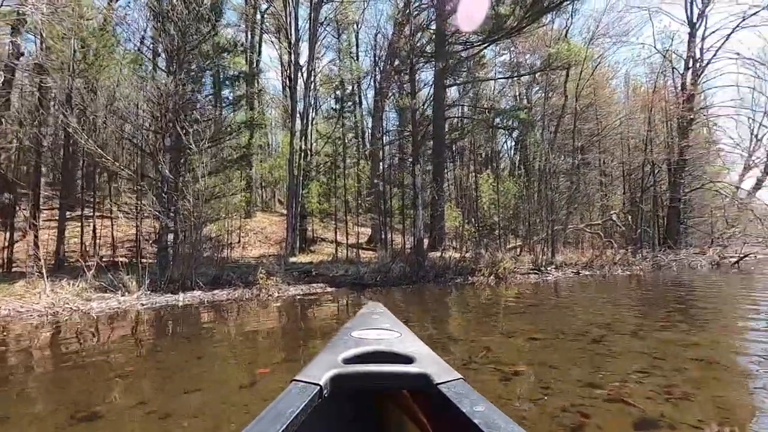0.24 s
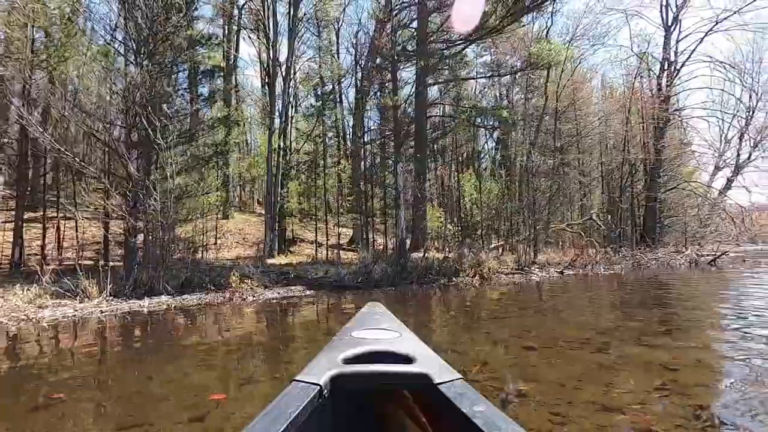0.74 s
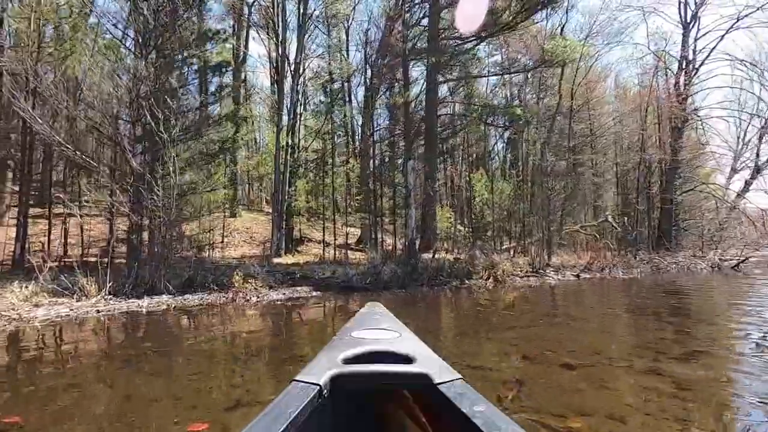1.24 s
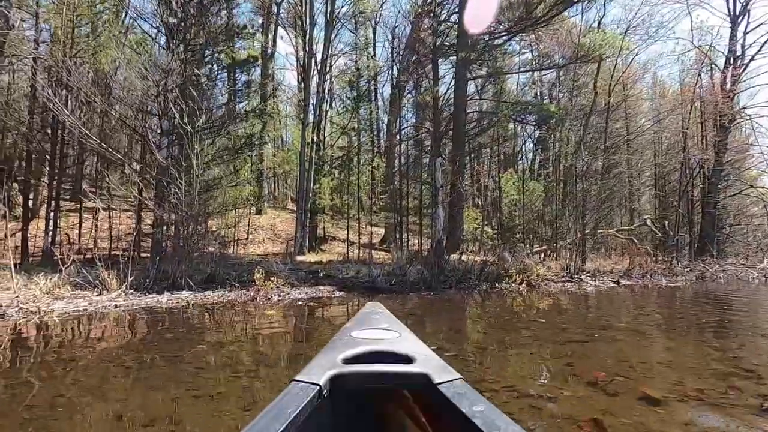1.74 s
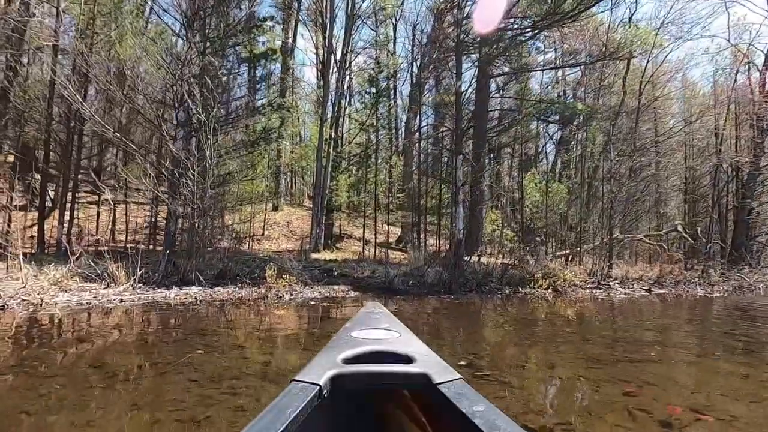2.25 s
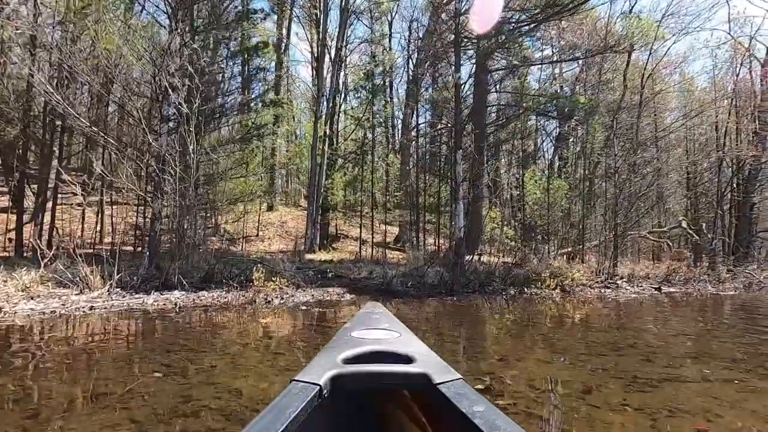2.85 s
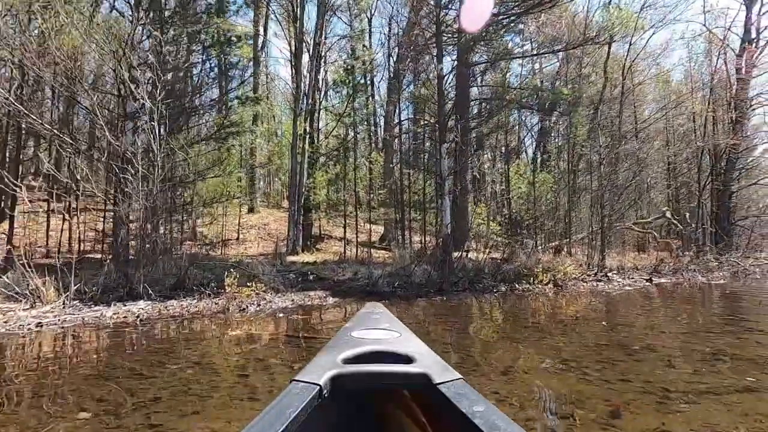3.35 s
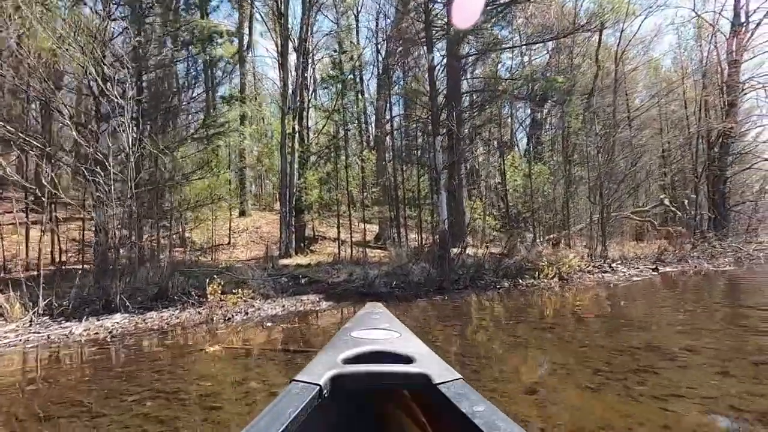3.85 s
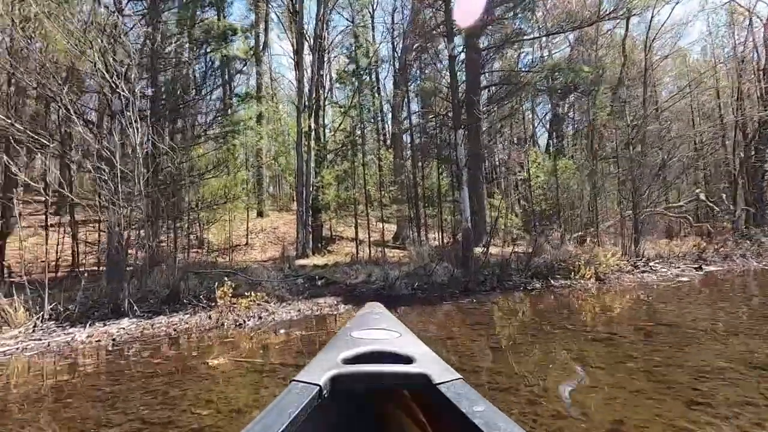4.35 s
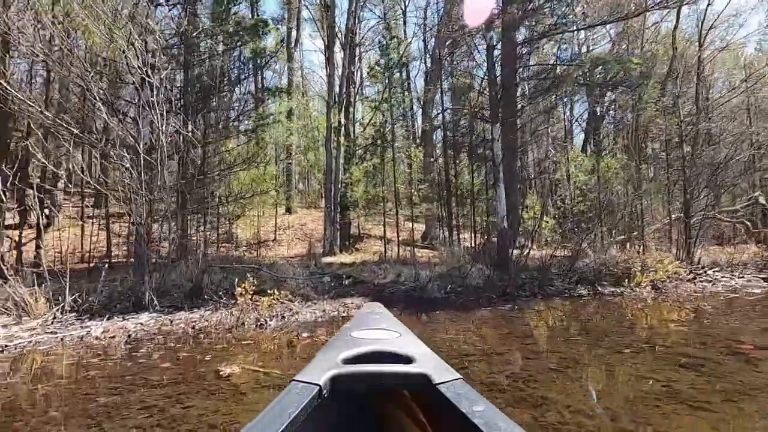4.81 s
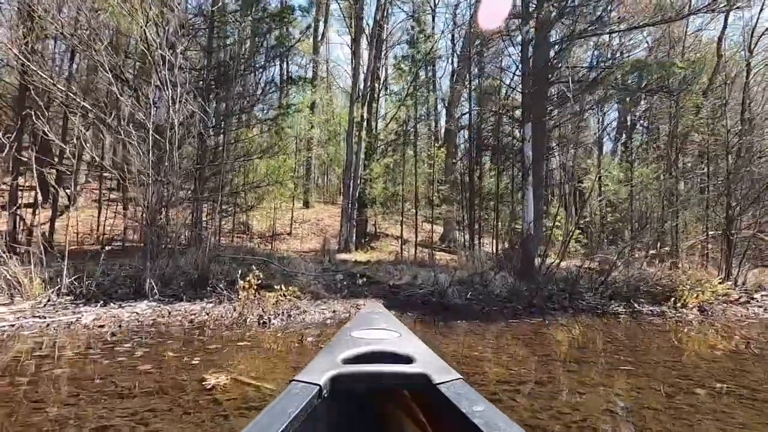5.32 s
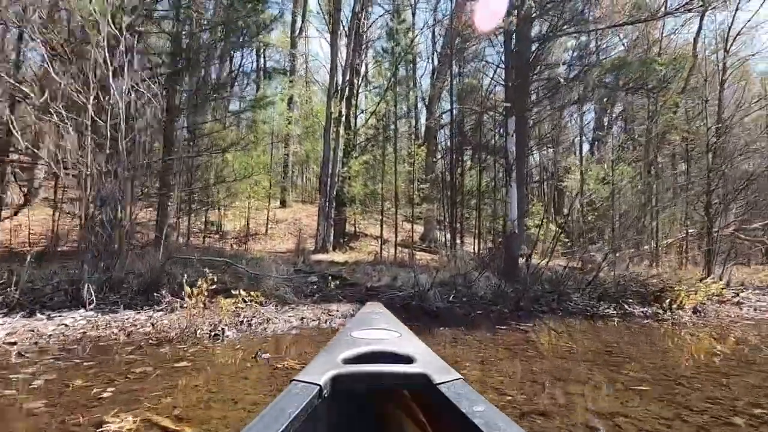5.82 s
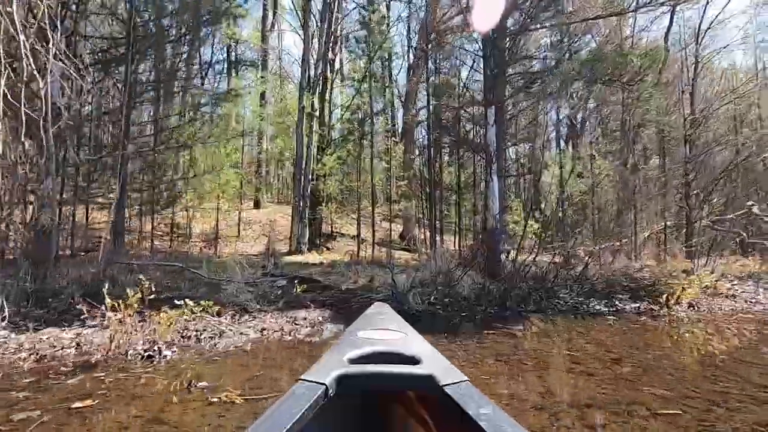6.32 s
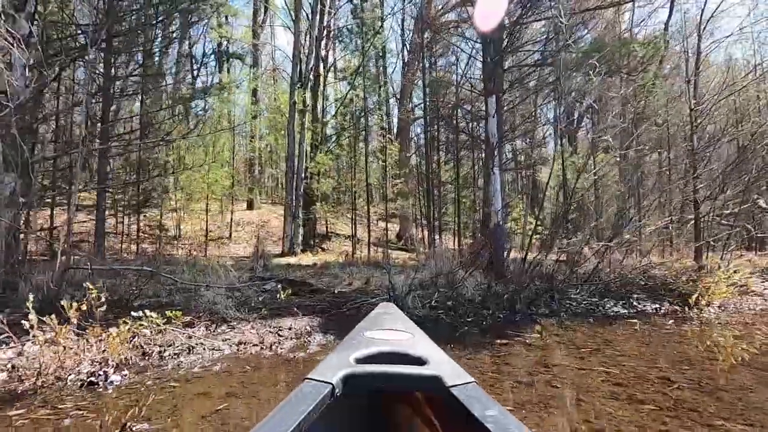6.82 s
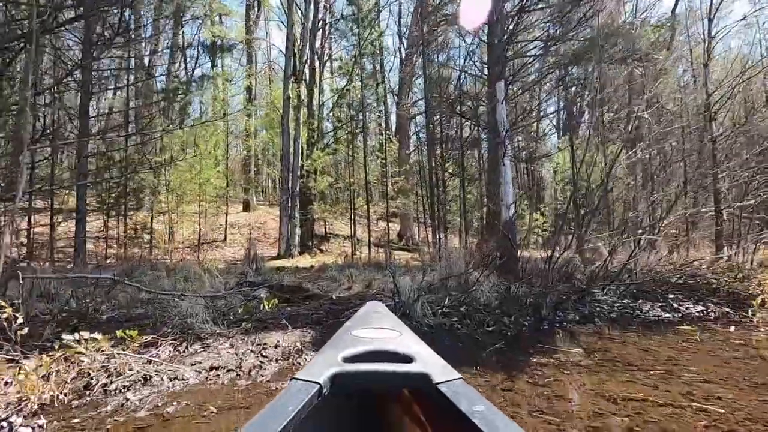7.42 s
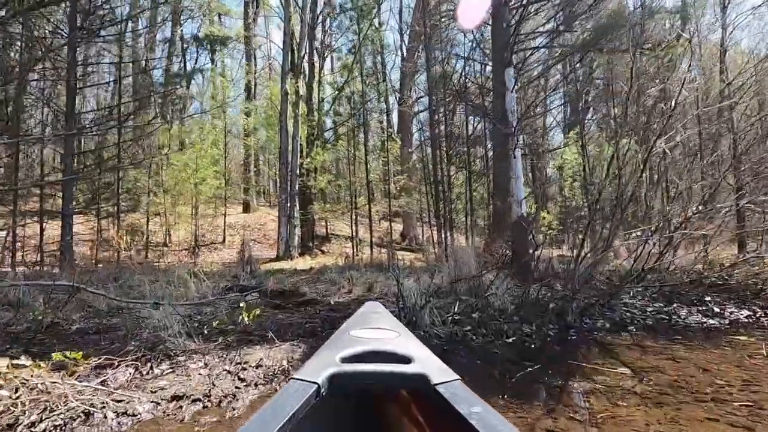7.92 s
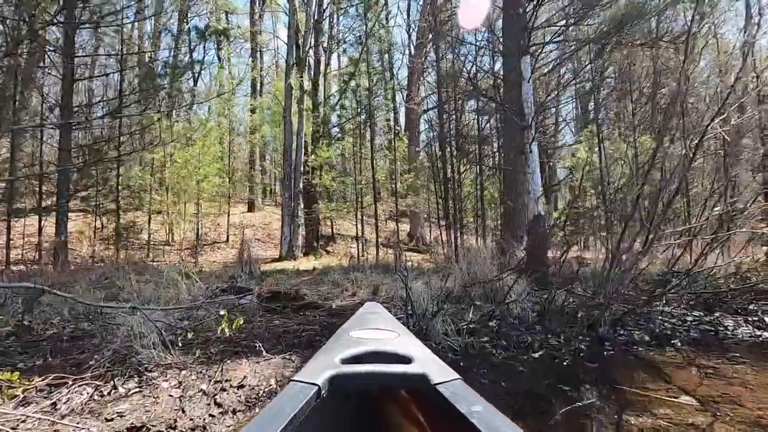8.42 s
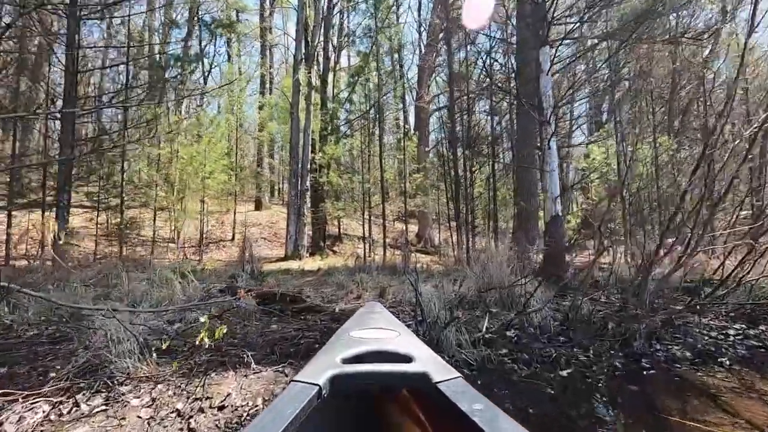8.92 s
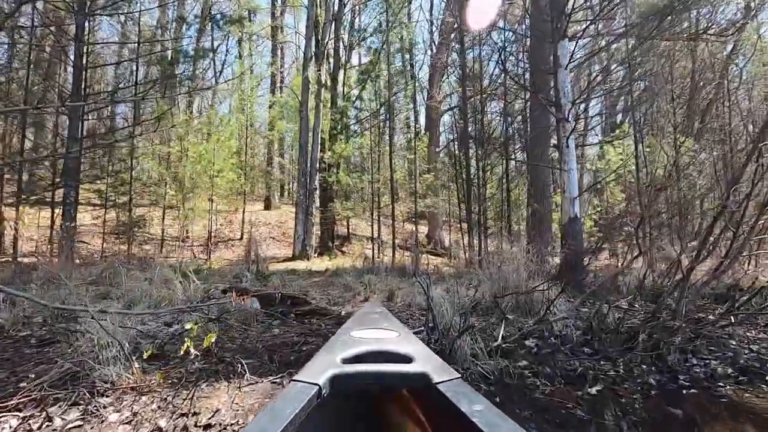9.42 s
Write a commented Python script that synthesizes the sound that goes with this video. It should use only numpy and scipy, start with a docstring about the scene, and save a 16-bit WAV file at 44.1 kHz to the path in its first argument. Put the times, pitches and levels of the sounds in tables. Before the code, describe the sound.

Close water lapping at a canoe, mostly left, with sparse hollow bumps and faint birds, ending in gritty grounding thuds, twig snaps and breeze.

```python
"""On the water by a wooded bank, inside a canoe that glides in and grounds. Wavelets lap and plop along the hull,
mostly on the left: decaying, rising tones over filtered noise. Paddle strokes boom through the hull's resonances
and a metal shaft rubs the gunwale, excited by friction noise. The bow scrapes aground in bursts of grit; twigs
snap and pebbles knock as brief rings. Low noise rumbles as the jolting boat shakes the microphone, wind rises in
the pines as coloured noise, and far birds whistle now and then in falling, echoing tones."""
import sys
import numpy as np
from scipy import signal
from scipy.fft import rfft, irfft
from scipy.io import wavfile
from scipy.ndimage import uniform_filter1d

SR = 44100
rng = np.random.default_rng(int(sys.argv[2]) if len(sys.argv) > 2 else 0)


def dump(signal):
    """Clip the signal to [-1, 1] and save it as 16-bit WAV at the path in sys.argv[1]."""
    limited = np.clip(np.atleast_2d(signal).T, -1, 1)
    pcm = np.round(limited * 32767).astype(np.int16)
    wavfile.write(sys.argv[1], SR, pcm)


N = 425987
TIME = np.arange(N) / SR
TOP_HZ = 15400

# All table levels are relative: the layers apply gains of their own.
# wind in the pines, also felt by the hull: [t/s, level/dB]
BREEZE = [(0, -62.5), (.8, -70), (2.5, -68), (4.5, -71.5), (5.6, -66), (7.1, -65.5), (7.6, -58), (8.3, -54),
          (8.8, -54.5), (9.3, -53), (9.66, -53.5)]
# the keel catching on the ground: [t/s, hull boom level/dB, hold/s, grit level/dB]
CATCHES = [(7.537, -36, 0.065, -40), (7.764, -35.5, 0.025, -48), (7.847, -39.5, 0.015, -46.5),
           (7.914, -41.5, 0.03, -42.5), (7.988, -30.5, 0.032, -42), (8.068, -33, 0.098, -42.5),
           (8.185, -37, 0.014, -61), (8.33, -40.5, 0.014, -53), (8.579, -47.5, 0.04, -71)]
# the bow slides on the bank from the first touch until it comes to rest
TOUCH_S, SLIDE_S, SETTLE_S = 7.53, 0.87, 0.13
CATCH_ATTACK_S = 0.0055


def undb(db):
    """Logarithmic level: decibels to amplitude gain."""
    return 10 ** (np.asarray(db) / 20)


def unit(x):
    """Power normalization: scale to rms 1."""
    return x / np.sqrt(np.mean(x ** 2) + 1e-20)


def curve(rows):
    """Linear interpolation of a table's second column in time."""
    rows = np.array(rows, float)
    return np.interp(TIME, rows[:, 0], rows[:, 1])


def colour(x, points):
    """Minimum-phase filtering: a causal response through [f/Hz, level/dB] points."""
    hz, db = np.transpose(points)
    size = 4096
    f = np.maximum(np.arange(size // 2 + 1) * SR / size, 1)
    log_magnitude = np.log(undb(np.interp(np.log(f), np.log(hz), db)))
    # folding the cepstrum onto positive times makes the response causal
    cepstrum = irfft(log_magnitude)
    cepstrum[1:size // 2] *= 2
    cepstrum[size // 2 + 1:] = 0
    response = irfft(np.exp(rfft(cepstrum)))
    return signal.oaconvolve(np.atleast_2d(x), response[None], axes=1)[:, :N]


def ring(x, modes):
    """Modal superposition: parallel resonances of alternating sign."""
    out = 0
    for k, (hz, width, db) in enumerate(modes):
        resonance = signal.lfilter(*signal.iirpeak(hz, hz / width, SR), x)
        out = out + (-1) ** k * undb(db) * resonance
    return out


def walk(rate):
    """Low-pass randomness: held random values, renewed at a rate in Hz, smoothed to rms 1."""
    k = int(SR / rate)
    held = np.repeat(rng.standard_normal(N // k + 1), k)
    smooth = uniform_filter1d(uniform_filter1d(held, k), k)
    return unit(smooth[:N])


def stereo_noise(width):
    """Partial coherence: two noises share all but a side part of the given width."""
    mid, side = rng.standard_normal((2, N))
    return unit(np.array([mid + width * side, mid - width * side]))


def steady(x, size):
    """Level compression: evens out the power over size samples, keeping quicker lumps, at rms 1."""
    power = uniform_filter1d(np.mean(x ** 2, axis=0), size)
    return unit(x / np.sqrt(np.abs(power) + 0.12 * np.mean(power)))


def swell(s, attack, hold, release):
    """Exponential growth and decay: builds up to time s, holds, then dies away."""
    exponent = np.minimum((TIME - s) / attack, (s + hold - TIME) / release)
    return np.exp(np.clip(exponent, -30, 0))


def sides(pan_db):
    """Interchannel level difference: gains of constant power, left minus right in dB."""
    g = undb(np.array([pan_db, -pan_db]).reshape(2, -1) / 2)
    return g / np.sqrt(np.mean(g ** 2, axis=0))


def port_times(length, pan_db):
    """Arrival-time difference: time since an onset at two ports, the left one lagging for sounds on the left."""
    t = np.arange(int(length * SR) + 16) / SR
    lag_s = 0.00011 * np.clip(pan_db / 8, 0, 1)
    return np.maximum(np.array([t - lag_s, t]), 0)


def add(out, s, sound):
    """Linear superposition: mix a stereo sound in at time s."""
    i = int(np.clip(s * SR, 0, N - 1))
    out[:, i:i + sound.shape[1]] += sound[:, :N - i]


def echoes(x, t60):
    """Diffuse reverberation: an exponential noise tail of unit energy, different on each side."""
    t = TIME[:SR]
    tail = rng.standard_normal((2, len(t))) * undb(-60 * t / t60) * (t > .002)
    tail = tail / np.sqrt(np.sum(tail ** 2, axis=1, keepdims=True))
    return signal.oaconvolve(x, tail, axes=1)[:, :N]


def bubble(hz, life, pan_db, rise):
    """Damped oscillation: a dying tone that climbs by its rise, as a bubble does on nearing the surface."""
    t = port_times(5 * life, pan_db)
    age = t / life
    phase = 2 * np.pi * hz * t * (1 + rise * (age - 1) / 2)
    onset = 1 - np.exp(-t * hz * 4)
    return sides(pan_db) * np.sin(phase) * np.exp(-age ** 1.01) * onset


def crack(life, pan_db):
    """Impulsive excitation: a very short, exponentially dying burst of noise."""
    t = port_times(.012, pan_db)
    # both ports hear the same noise, each at its own time
    noise = np.interp(t, t[1], rng.standard_normal(t.shape[1]))
    return sides(pan_db) * noise * np.exp(-t / life) * (t > 0)


def grains(centre_hz, pan_db, octaves, cycles, spread_db, rise, count):
    """Granular superposition: many uneven rings scattered about a pitch; most hold it, a few climb."""
    out = np.zeros((2, N))
    centre_hz, pan_db = np.broadcast_to(centre_hz, N), np.broadcast_to(pan_db, N)
    for when, up, down, size, damping, place, shallow in rng.random((count, 7)):
        i = int(when * N)
        hz = min(centre_hz[i] * 2 ** (octaves * (up - down)), TOP_HZ)
        life = cycles * 4 ** (damping - .5) / hz
        gain = undb(spread_db * min(-np.log(1 - size), 3.5)) * np.sqrt(hz)
        pan = pan_db[i] + 8 * (place - .5)
        add(out, i / SR, gain * bubble(hz, life, pan, rise * shallow ** 4))
    return steady(out, size=SR // 25)


def wind(rustle_db=-14):
    """Aeroacoustic noise: a smooth hiss from the pines and a faint rustle follow the breeze."""
    # spectrum of the pines: [f/Hz, level/dB]
    pine_spectrum = [(240, -57.5), (400, -7), (828, -3.5), (1100, 2.5), (1500, 0), (1740, -3), (2290, -3),
                     (2470, -2.5), (2790, -3.5), (3890, -7), (7580, -16.5), (12300, -28), (15000, -38)]
    breeze_db = curve(BREEZE)
    hiss = unit(colour(stereo_noise(0.62), pine_spectrum)) * sides(0.76)
    pines = hiss * undb(breeze_db + 0.55 * walk(13.0))
    # dry stems on the bank tick about 90 times a second, louder with the breeze
    ticks = rng.standard_normal((2, N)) * (rng.random(N) < 90 / SR)
    rustle = unit(colour(ticks, pine_spectrum)) * undb(breeze_db + rustle_db)
    return pines + rustle


def shaking():
    """Power summation: strength of the microphone's rumble, a faint restless floor and a swell at each jolt."""
    # low rumbles as the jolting boat shakes the microphone: [t/s, level/dB, decay/s]
    jolt_table = [(0.29, -53.5, 0.12), (0.88, -59.5, 0.027), (3.76, -53.5, 0.13), (7.57, -38, 0.051),
                  (7.95, -56, 0.35), (8.19, -44, 0.054)]
    build_share, floor_db, floor_spread_db = 0.21, -73, 5.5
    floor = undb(floor_db + floor_spread_db * np.tanh(walk(17)))
    power = floor ** 2
    for s, db, decay in jolt_table:
        power = power + (undb(db) * swell(s, build_share * decay, 0, decay)) ** 2
    return np.sqrt(power)


def microphone_rumble(rumble_db=-1):
    """Structure-borne vibration: low noise swells as the jolting boat shakes the microphone."""
    # spectrum of the rumble: [f/Hz, level/dB]
    rumble_spectrum = [(12, 4), (35, 9.5), (70, 13), (120, 3), (300, -57), (4000, -85)]
    rumble = steady(colour(stereo_noise(0.38), rumble_spectrum), size=SR // 8)
    return rumble * shaking() * undb(rumble_db)


def drag():
    """Sliding friction: the ground's force on the hull, a steady slide with a jerk at every keel catch."""
    slide_db, release_s = -48.5, 0.033
    slide = undb(slide_db) * swell(TOUCH_S, CATCH_ATTACK_S, SLIDE_S, SETTLE_S)
    power = slide ** 2
    for s, db, hold, _ in CATCHES:
        power = power + (undb(db) * swell(s, CATCH_ATTACK_S, hold, release_s)) ** 2
    return np.sqrt(power)


def hull(idle_db=-70, breeze_db=-8, scrape_db=-1, judder_db=1.0, slosh_db=-14, thud_db=-8, heavy_db=-37):
    """Forced panel resonance: ripples, wind, strokes and ground push unevenly and the hull booms."""
    # hull resonances: [f/Hz, width/Hz, level/dB]
    panel_modes = [(78.2, 19.5, -5), (126.2, 22.4, -2), (167.6, 36.7, 2.5), (232.4, 49.3, 1),
                   (275.7, 46, -0.5), (330, 64.5, -6), (460, 84, -14.5)]
    # paddle strokes and ripples nudging the hull: [t/s, level/dB, time scale/s]
    bump_table = [(0.232, -47, 0.045), (1.561, -54, 0.041), (3.635, -60.5, 0.025), (3.717, -48, 0.074),
                  (3.966, -59, 0.053), (4.329, -56, 0.035), (4.53, -73, 0.16), (4.719, -60.5, 0.01),
                  (6.17, -60, 0.019), (6.679, -58.5, 0.027), (6.999, -51.5, 0.036), (7.25, -56, 0.024),
                  (9.56, -59.5, 0.088)]
    load = undb(idle_db + 6.3 * np.tanh(walk(18))) + undb(scrape_db) * drag()
    load = np.hypot(load, undb(curve(BREEZE) + breeze_db))
    for s, db, scale in bump_table:
        # each nudge peaks at half its time scale
        age = np.maximum(TIME - s, 0) / scale
        load = load + undb(db) * age * np.exp(2 - 2 * age)
    push = stereo_noise(.26) * undb(judder_db * walk(60))
    boom_spectrum = [(40, -16.0), (100, -3.0), (350, -3.5), (700, -8.5), (2000, -32.5), (12000, -84)]
    boom = steady(colour(ring(push, panel_modes), boom_spectrum), size=SR // 32)
    slosh_spectrum = [(200, -21.5), (420, 6.5), (650, -1.5), (900, -9.0), (1500, -20.0),
                      (4000, -28), (14000, -87)]
    slosh = unit(colour(stereo_noise(0.8), slosh_spectrum))
    thud_spectrum = [(30, -15), (75, -15.0), (125, 21.5), (180, 11.0), (400, -58.0), (3000, -100)]
    thud = steady(colour(stereo_noise(0.061), thud_spectrum), size=SR // 40)
    # the share of thud grows with the load, so mainly heavy loads shake the whole boat
    shake = undb(thud_db) * np.minimum(load / undb(heavy_db), 1)
    return load * (boom + undb(slosh_db) * slosh + shake * thud)


def waves():
    """Energy summation: strengths of water and spray, with the power-weighted bubble pitch and side."""
    # wavelets breaking on the hull:
    # [t/s, length/s, level/dB, spray level relative to it/dB, bubble f/Hz, left minus right/dB]
    wavelet_table = [(0.01, 0.22, -49, -8.5, 1654, 15), (0.241, 0.21, -55, -6, 1940, 7.5),
                     (0.464, 0.15, -55, -3, 2120, 8.5), (0.927, 0.13, -65, 7.5, 2660, 6),
                     (1.141, 0.23, -62.5, 1.5, 2130, 9.5), (1.326, 0.33, -64, 1.5, 2010, 7.5),
                     (1.565, 0.041, -51, -11, 910, 4.5), (1.782, 0.083, -58, 0.5, 2070, 2.5),
                     (1.909, 0.092, -68, 9, 2580, -3), (2.05, 0.15, -63.5, 7, 2280, 14),
                     (2.27, 0.025, -50.5, 1, 2810, 35), (2.476, 0.015, -52, -2.5, 1720, 5.5),
                     (2.753, 0.049, -44, -8.5, 1680, 8.5), (2.845, 0.03, -51.5, -8, 1295, 9),
                     (2.878, 0.057, -41.5, -12.5, 1107, 9), (2.926, 0.066, -45.5, -13.5, 1450, 8.5),
                     (3.01, 0.12, -48.5, -11.5, 1297, 5), (3.178, 0.018, -46.5, -12.5, 1584, 10),
                     (3.217, 0.029, -39, -10, 1524, 11), (3.237, 0.0097, -36.5, -14, 1870, 9.5),
                     (3.25, 0.1, -46, -9, 1900, 12), (3.363, 0.13, -50, -10.5, 2155, 13),
                     (3.474, 0.16, -55, -17, 1570, 11.5), (3.719, 0.15, -53.5, -11.5, 2090, 7.5),
                     (3.974, 0.009, -51.5, -12, 1910, 9), (4.027, 0.078, -51.5, -13.5, 1540, 4),
                     (4.365, 0.013, -45, -30, 1840, 5), (4.612, 0.042, -59, -10, 1600, 6),
                     (4.735, 0.14, -56, -6.5, 2186, 3), (4.926, 0.15, -59.5, -2.5, 1940, 5),
                     (5.636, 0.034, -54.5, -9, 1800, 9), (5.722, 0.19, -53, -2, 1880, 8),
                     (5.946, 0.4, -51.5, -5, 1860.0, 23), (6.154, 0.033, -42.5, -12, 1570, 11),
                     (6.181, 0.084, -43.5, -6, 1570, 13), (6.333, 0.25, -59.5, 3, 2420, 22),
                     (6.633, 0.024, -50.5, 1, 2850, 2.5), (6.835, 0.12, -51.5, 1.5, 2350, 4),
                     (7.002, 0.02, -47, -4, 1664, 5.5), (7.244, 0.058, -54.5, -27, 1700, 5.5)]
    # every wavelet builds, sags over its length and drains; between wavelets the water only ripples
    build_s, sag_db, drain_s = 0.00557, 10, 0.0144
    ripple_db, ripple_spray_db, ripple_hz, ripple_pan_db = -71, -75, 1950, 9
    ripple = undb(walk(11.0)) * (TIME < TOUCH_S + SLIDE_S)
    water = (undb(ripple_db) * ripple) ** 2 + 1e-14
    spray = (undb(ripple_spray_db) * ripple) ** 2
    pitch, side = water * ripple_hz, water * ripple_pan_db
    for s, length, db, spray_db, hz, pan in wavelet_table:
        sag = np.interp(TIME, [s, s + length], [1, undb(-sag_db)])
        power = (undb(db) * sag * swell(s, build_s, length, drain_s)) ** 2
        water = water + power
        spray = spray + power * undb(spray_db) ** 2
        pitch = pitch + power * hz
        side = side + power * pan
    return np.sqrt(water), np.sqrt(spray), pitch / water, side / water


def lapping(flow, splash, pitch_hz, pan_db, bubbles_db=-1, wash_db=-12.0, spray_db=-2, mist_db=-6):
    """Entrained-bubble radiation: wavelets fold into a dense gurgle over a soft wash and throw a fine spray."""
    # spectra of the bubbles, the wash and the spray: [f/Hz, level/dB]
    bubble_spectrum = [(250, -13), (480, -5), (750, -1.5), (1150, 3), (2800, 6), (4200, 6), (7000, -22.5)]
    wash_spectrum = [(250, -37), (500, 0.5), (1000, 1), (1700, 2), (2800, 9.5), (4200, -11), (7000, -55)]
    spray_spectrum = [(2000, -5.5), (4200, 1), (5500, -3), (7500, -7), (8600, -12), (12000, -16.5),
                      (16000, -34)]
    cloud = grains(pitch_hz, pan_db, octaves=1.8, cycles=6.1, spread_db=3.5, rise=0.084, count=11000)
    bubbles = unit(colour(cloud, bubble_spectrum))
    wash = unit(colour(stereo_noise(1.0), wash_spectrum)) * sides(pan_db) * undb(1.3 * walk(160))
    droplets = grains(6640, pan_db, octaves=1.27, cycles=3.4, spread_db=10.0, rise=0.065, count=4000)
    drops = unit(colour(droplets, spray_spectrum))
    mist = unit(colour(stereo_noise(.9), spray_spectrum) * undb(5 * walk(200)))
    water = undb(bubbles_db) * bubbles + undb(wash_db) * wash
    spray = undb(spray_db) * drops + undb(mist_db) * mist
    return flow * water + splash * spray


def plops(gain_db=1, slap_db=1, rise=0.015, tick_db=-19, tick_edge=0.72):
    """Damped resonance and water impact: bubbles and knocks ring, slaps die fast, each starting with a tick."""
    # loud bubbles at the waterline, with low hull knocks and mud bubbles at the grounding:
    # [t/s, level/dB, f/Hz, decay/cycles, left minus right/dB]
    plop_table = [(0.041, -47, 775, 5.2, 13), (0.083, -37.5, 2250, 9.2, 13.0), (0.102, -39.5, 2325, 10, 12),
                  (0.256, -40, 3800, 7, 17), (0.48, -43, 1370, 11, 3), (0.519, -40.5, 4160, 7.5, 2.5),
                  (0.145, -38, 1002, 14, 13), (0.167, -35, 2200, 4, 12.0), (0.564, -30, 3250, 5.1, 3.5),
                  (0.932, -22, 4230, 4.1, 30), (0.9361, -48, 1910, 17, 14.0),
                  (1.0055, -41, 2520.0, 6, 14.0), (1.19, -42.5, 2300, 6.5, 11), (1.211, -29, 7150, 2.8, 5),
                  (1.4255, -40.5, 3180, 8.0, 19.0), (1.5769, -48.5, 890, 8.8, -6),
                  (1.813, -42, 1345, 8.6, 0), (1.811, -30.5, 4260, 5.1, 18), (1.902, -43.5, 2250, 13, 8.0),
                  (1.9545, -53.5, 854, 11, 4), (2.1419, -29, 3140, 6.8, 21), (2.16, -50, 1340, 14, 9),
                  (2.4078, -32.5, 4620, 3.8, 9.0), (2.693, -33.5, 3460, 5.5, 20.0),
                  (2.7534, -40.5, 918, 6.8, 17), (2.7659, -48, 1600, 5.5, 17.0),
                  (2.767, -33, 3030, 11, 17.0), (2.768, -46.5, 432, 7, 6), (2.875, -37.5, 3850, 8.3, 21),
                  (2.8776, -35, 1300, 4.7, 22), (2.8786, -40, 656, 11, 16), (2.881, -39, 1227, 29, 10),
                  (2.904, -40, 1550, 9, 13), (2.912, -43.5, 607, 5.3, 11), (2.95, -40, 980, 19, 8),
                  (2.956, -45, 1722, 14, 13), (2.959, -34.5, 2870, 6.6, 16), (3.014, -31, 1290, 2.4, 17),
                  (3.048, -41.5, 1360, 9, 5), (3.071, -40.5, 1630, 13, 4), (3.078, -47, 1024, 8.9, 14),
                  (3.088, -45, 1378, 8, 7), (3.165, -43, 2550, 9.2, 17), (3.158, -28.5, 4570, 1.9, 7),
                  (3.181, -42, 2500, 12, 15), (3.232, -31, 2380, 9.8, 13.0), (3.235, -20, 4820, 6.4, 12),
                  (3.235, -33, 1007, 9.6, 10), (3.237, -53, 473, 7, 11), (3.251, -35, 4220, 9, 15),
                  (3.258, -34, 3617, 9.2, 19), (3.2825, -21.5, 3010.0, 4.5, 17),
                  (3.313, -43, 1280, 7.2, 14), (3.314, -49.5, 727, 11.5, 10), (3.392, -39, 2050, 8, 11),
                  (3.405, -57, 375, 12, 8), (3.411, -40, 3040, 8.1, 15), (3.603, -50, 1495, 24, 10),
                  (3.577, -40, 1780, 4.3, 13), (3.7781, -29, 3540, 3.4, 1.5), (3.8115, -36.5, 2200, 6.1, 2),
                  (4.024, -24.5, 1740, 2.8, 5), (4.0379, -26.5, 2150, 3.1, 4), (4.048, -45, 1210, 6.8, 1),
                  (4.065, -47, 1040, 8, -3), (4.3123, -35, 2380, 2.3, 5), (4.364, -34, 2870, 9.5, 7),
                  (4.3627, -38, 1900, 4, 7), (4.3662, -35.5, 1370, 4.8, 18), (4.3721, -40, 1137, 8.5, 6),
                  (4.3785, -40, 1280, 6.7, 4), (4.609, -45, 1220, 11.4, 11.0),
                  (4.7985, -30.5, 3110.0, 3.3, 18), (4.812, -45, 1981, 7.5, 1), (4.818, -42, 2928, 7.6, 9),
                  (5.032, -45, 1360, 9.3, 3), (5.205, -29.5, 2340, 6.4, 16), (5.2056, -25, 4250, 8.6, 9),
                  (5.276, -46, 1390, 4.9, 0), (5.445, -50.5, 1214, 21, 12), (5.206, -27.5, 7200, 5.7, 7),
                  (5.2118, -33, 6800, 4.8, 14), (5.5045, -26.5, 5130, 6.1, 3.5),
                  (5.5804, -45, 3050, 9.7, 15.0), (5.7557, -32.5, 1820, 7.7, 13.0),
                  (5.778, -47, 1033, 7.9, 12), (5.797, -42, 1460, 7.2, 19), (5.86, -39.5, 2497, 7, 12),
                  (5.9112, -34.5, 2594, 16, 14), (5.95, -41, 2240, 14, 10), (6.0013, -36, 1460, 5.1, 9),
                  (6.0174, -37.5, 1340, 8.7, 10.0), (6.0534, -32.1, 1950, 5, 10), (6.06, -38, 2950, 10, 8),
                  (6.071, -42, 1690, 9, 9), (6.086, -44, 1220, 8, 12), (6.124, -40.5, 1030, 5.6, 24),
                  (6.1288, -25, 2660.0, 3.3, 11), (6.162, -37.5, 1250, 8.7, 15),
                  (6.1715, -35, 1960, 9, 13.0), (6.1813, -14.5, 3930, 2.1, 15),
                  (6.189, -27, 2870, 8.7, 18.0), (6.194, -42, 1464, 7.5, 8), (6.216, -32.5, 3531, 8.6, 19),
                  (6.229, -43, 1370, 9.9, 10), (6.23, -38, 2120, 9, 11), (6.2403, -40.5, 998, 9.4, 14),
                  (6.344, -41.5, 1940, 6.9, 10), (6.359, -43, 1808, 9.7, 11), (6.392, -33, 3830, 4, 15),
                  (6.5774, -31.5, 4050, 3.2, 4), (6.639, -34, 3700, 3.7, 5),
                  (6.6574, -29.5, 2450, 5.5, 5.5), (6.8087, -38, 2220, 18, 3), (6.8256, -26, 1896, 12, 1.0),
                  (6.858, -24, 2650, 6.2, 5), (6.838, -37, 3100, 8.2, 6), (6.86, -36, 3430, 8, -2),
                  (6.8884, -29.5, 4730, 3.6, 1.5), (6.91, -40.5, 1990, 8.1, 4), (6.927, -49, 1520, 16, 2),
                  (6.953, -45.5, 1080, 21, 0), (7.003, -36.5, 960, 1.9, -4), (7.411, -42, 2067, 12, 8),
                  (7.47, -46.5, 2239, 12, 4), (7.485, -47, 2200, 13, 7), (7.6492, -33.5, 2080.0, 4, 4),
                  (7.7691, -56, 420, 5.1, -4), (7.885, -37, 1340, 8.3, 3), (7.9295, -38, 396, 3.5, 3)]
    # water smacking flat against the side: [t/s, level/dB, f/Hz, decay/cycles, left minus right/dB]
    slap_table = [(0.9317, -23.5, 8600, 0.52, 6.5), (1.8108, -33.5, 5740, 1.8, 14),
                  (1.902, -35.5, 5600, 2.5, 16), (2.6277, -34.5, 5040, 1.6, 0.5),
                  (2.7543, -33, 5900, 0.49, 12), (2.7539, -17, 3320, 4.7, 23), (2.7543, -10, 1610, 1.8, 13),
                  (2.7645, -29, 980, 1.1, 17), (2.891, -20, 1510, 1.6, 21), (3.2347, -27, 640, 0.9, 29),
                  (3.2352, -8, 1140, 0.94, 13), (3.4808, -34, 1600, 2.7, 5), (4.807, -28.5, 1980, 1.8, 2),
                  (5.2054, -15.5, 3200, 1.46, 35), (5.824, -31, 4900, 2.1, 9), (5.825, -45, 8880, 0.85, 19),
                  (5.8253, -6, 2200, 0.57, 13), (6.5904, -28, 3640, 1.5, 8), (6.8273, -20.5, 2980, 2.8, 6)]
    out, smacks, ticks = np.zeros((3, 2, N))
    for layer, rows, layer_db in [(out, plop_table, gain_db), (smacks, slap_table, slap_db)]:
        for s, db, hz, cycles, pan in rows:
            add(layer, s, undb(db + layer_db) * bubble(hz, cycles / hz, pan, rise))
            # the tick is high-passed from a little below the pitch
            edge = signal.butter(3, min(tick_edge * hz, TOP_HZ), "high", fs=SR)
            add(ticks, s, undb(db + tick_db) * signal.lfilter(*edge, crack(0.0011, pan)))
    # slaps are thin in the bass
    smacks = colour(smacks, [(300, -55), (800, -19), (1400, -6.0), (6000, 5.5), (12000, -5)])
    tick_spectrum = [(300, -57), (1500, 1), (5000, 8.5), (7500, -4.5), (9000, -15), (16000, -31)]
    return out + smacks + colour(ticks, tick_spectrum)


def gulps():
    """Frequency glide: gulps and single climbing bubbles start slowly, then swoop up in pitch, swell and stop."""
    # gulps and single climbing bubbles: [t/s, length/s, start f/Hz, end f/Hz, level/dB, left minus right/dB]
    gulp_table = [(0.277, 0.018, 1340, 1640, -45.5, 14), (0.405, 0.07, 531, 1635, -32.5, 1),
                  (0.605, 0.034, 804, 1300, -40.5, 5), (0.634, 0.04, 960, 1400, -47.5, 1),
                  (0.672, 0.017, 1500, 1900, -55, 11), (1.778, 0.015, 1710, 2300, -42, 7),
                  (1.805, 0.019, 1260, 1600, -49, 0), (2.272, 0.011, 1860, 2870, -36, 21),
                  (2.918, 0.067, 278, 470, -50.5, 6), (3.382, 0.034, 716, 825, -57, 8),
                  (4.03, 0.081, 740, 926, -56, -2), (5.757, 0.011, 1840, 2340, -31.5, 14),
                  (6.145, 0.031, 1044, 1400, -49, 12), (6.175, 0.068, 670, 1110, -40, 12),
                  (6.848, 0.035, 840, 1330, -47, -2), (6.85, 0.014, 2466, 2880, -44, 4)]
    out = np.zeros((2, N))
    for s, length, start_hz, end_hz, db, pan in gulp_table:
        u = np.linspace(0, 1, int(length * SR))
        climb = np.interp(u, [0, .3, .54, .76, .86, 1], [0, .08, .27, .85, .97, 1])
        loudness = np.interp(u, [0, .03, .53, .69, .77, .83, 1], [0, .3, .3, 1, .9, .35, 0])
        hz = start_hz * (end_hz / start_hz) ** climb
        note = np.sin(2 * np.pi * np.cumsum(hz) / SR)
        add(out, s, sides(pan) * undb(db) * loudness * note)
    return out


def bird(drop_share=0.12, peak_share=0.2, fade_db=26):
    """Multiple scattering: a husky whistle drops quickly, levels off and fades, blurred among the trunks."""
    # falling whistles: [t/s, length/s, start f/Hz, end f/Hz, level/dB]
    whistle_table = [(0.348, 0.53, 3720, 3580, -60), (1.281, 0.21, 1787, 1750, -59.5),
                     (1.39, 0.16, 3440, 3230, -70), (1.42, 0.19, 1620, 1462, -58.5),
                     (2.413, 0.164, 1690, 1590, -63), (3.963, 0.45, 4253, 3653, -52.5),
                     (8.144, 0.59, 3990, 3590, -55.5)]
    out = np.zeros((2, N))
    # random amplitude and phase make the tone husky
    scatter = 0.55 + 0.6 * (walk(420) + 1j * walk(420))
    for s, length, start_hz, end_hz, db in whistle_table:
        u = np.linspace(0, 1, int(length * SR))
        hz = end_hz + (start_hz - end_hz) * np.exp(-u / drop_share)
        loudness = np.minimum(u / peak_share, undb(-fade_db * (u - peak_share)))
        loudness = loudness * np.minimum(10 * (1 - u), 1)
        note = np.imag(scatter[:len(u)] * np.exp(2j * np.pi * np.cumsum(hz) / SR))
        add(out, s, sides(0) * undb(db) * loudness * note)
    return 0.27 * out + 1.11 * echoes(out, t60=0.4)


def shaft(ring_db=-2, friction_db=-8.0):
    """Friction-excited modes: rubbing hisses and rings the hollow shaft; pressure builds, then lets go."""
    # the paddle shaft sliding on the gunwale: [start t/s, end t/s, level/dB]
    rub_table = [(1.605, 1.695, -52.5), (2.084, 2.213, -61.5), (5.196, 5.487, -48), (7.193, 7.293, -58),
                 (7.315, 7.476, -55.5)]
    # what the shaft rings with: [f/Hz, width/Hz, level/dB]
    tube_modes = [(1392, 54, -6.5), (2767, 16, 9.5), (3670, 24, -7.5), (4453, 6.3, 0), (4590, 50, -9),
                  (5153, 9.6, 3), (5500, 11, -6), (5930, 14, -6), (6412, 17, -17), (7700, 45, -8),
                  (7640, 17, -19), (9300, 27, -17)]
    # spectrum of the dry friction: [f/Hz, level/dB]
    friction_spectrum = [(700, -6), (1300, -2.5), (2000, -6), (3500, -1.5), (5100, 3.5), (6300, -7.5),
                         (7500, -6), (8500, -8.5), (14000, -23)]
    pressure = np.zeros(N)
    for a, b, db in rub_table:
        corners = [a, a + 0.2 * (b - a), a + 0.78 * (b - a), b]
        pressure += undb(db) * np.interp(TIME, corners, [0, 0.45, 1.3, 0])
    rub = stereo_noise(0.81) * undb(2.34 * walk(70))
    tone = ring(rub * pressure, tube_modes) / np.std(ring(rub, tube_modes))
    friction = pressure * unit(colour(rub, friction_spectrum))
    return sides(5.5) * (undb(ring_db) * tone + undb(friction_db) * friction)


def crunch():
    """Granular crushing: grit is steady while the bow slides, with a burst as each catch crushes the sand."""
    slide_db, release_s = -51.5, 0.079
    slide = undb(slide_db) * swell(TOUCH_S, CATCH_ATTACK_S, SLIDE_S, SETTLE_S)
    power = slide ** 2
    for s, _, hold, db in CATCHES:
        power = power + (undb(db) * swell(s, CATCH_ATTACK_S, 0.3 * hold, release_s)) ** 2
    return np.sqrt(power)


def grounding(grit_db=-6, grain_db=0.0, pebble_db=-8, knock_db=-1, splinter_db=-10):
    """Granular friction and brittle fracture: sand hisses, twigs snap and pebbles knock around the grounding."""
    # twigs snapping and pebbles knocking around the grounding: [t/s, level/dB, f/Hz, left minus right/dB]
    snap_table = [(7.533, -37, 1080, -4), (7.539, -30, 4480, 2), (7.621, -37, 1230, 3),
                  (7.746, -32.5, 2120, 6), (7.981, -30.5, 884, 4.5), (8.043, -36, 2050, 5),
                  (8.064, -42, 866, 4), (8.306, -24.5, 3940, 10), (8.372, -20.5, 6200, 7.5),
                  (8.454, -31.5, 1600, 4.5), (8.638, -34, 1830, 17), (8.71, -44, 1020, 29),
                  (8.966, -34, 3720, 4.5), (8.995, -39.5, 1550, 4), (9.527, -39, 1430, 11)]
    # spectrum of the sand: [f/Hz, level/dB]
    grit_spectrum = [(300, 0), (450, -18), (640, -13), (900, 2.5), (1300, -9.5), (2100, -7.5), (3200, -8),
                     (7000, -23), (12000, -28.5), (16000, -65)]
    rough = stereo_noise(0.72) * undb(grain_db * walk(500) + 2.6 * walk(51))
    grit = unit(colour(rough, grit_spectrum)) * sides(4.4)
    pebbles = grains(1290, 2.2, octaves=1.1, cycles=8.2, spread_db=3.5, rise=0.009, count=3600)
    out = (undb(grit_db) * grit + undb(pebble_db) * pebbles) * crunch()
    splinters = np.zeros((2, N))
    for s, db, hz, pan in snap_table:
        # each snap or knock rings for a few cycles at a steady pitch
        add(out, s, undb(db + knock_db) * bubble(hz, 4.8 / hz, pan, 0))
        add(splinters, s, undb(db + splinter_db) * crack(0.0021, pan))
    splinter_spectrum = [(800, -14.0), (4000, 2.5), (7500, 7.5), (9500, -8.0), (16000, -21)]
    return out + colour(splinters, splinter_spectrum)


def scene(boat_db=-13, shore_db=-27):
    """Reflection: water sounds bounce briefly inside the open boat and faintly off the trees."""
    water = plops() + gulps() + lapping(*waves())
    reflections = undb(boat_db) * echoes(water, t60=0.07) + undb(shore_db) * echoes(water, t60=1.0)
    boat = hull() + grounding() + shaft() + microphone_rumble()
    return water + reflections + boat + bird() + wind()


def record(dry):
    """Band limitation: the recorder cuts the top with a steep elliptic low-pass."""
    return signal.sosfilt(signal.ellip(8, .2, 70, TOP_HZ, fs=SR, output="sos"), dry)


dry = scene()
out = record(dry)
dump(out)
```